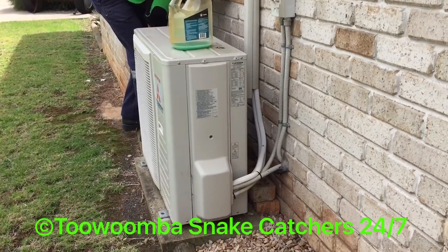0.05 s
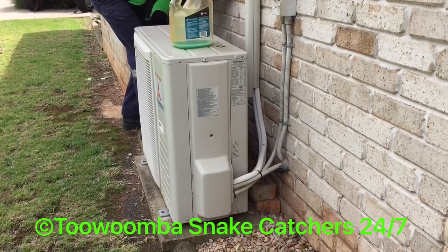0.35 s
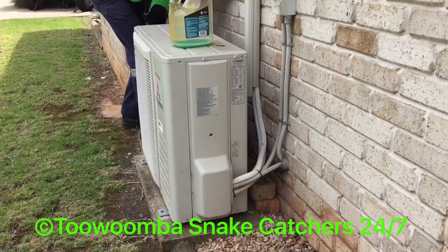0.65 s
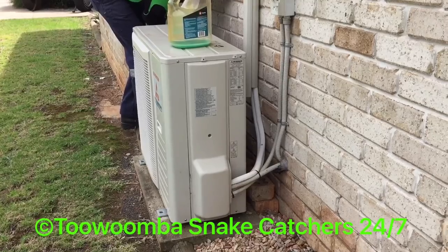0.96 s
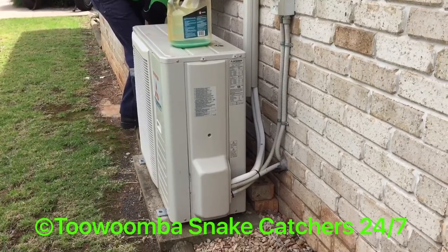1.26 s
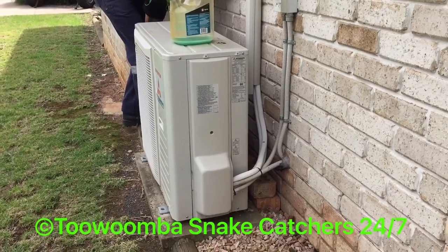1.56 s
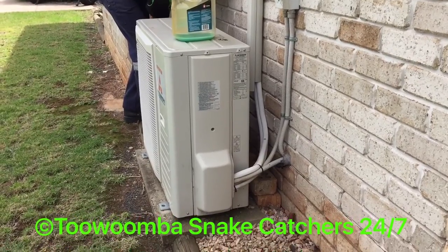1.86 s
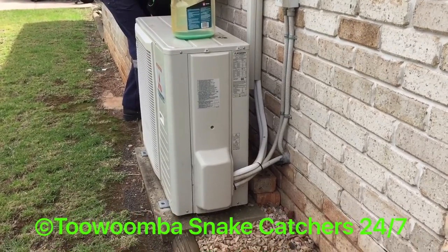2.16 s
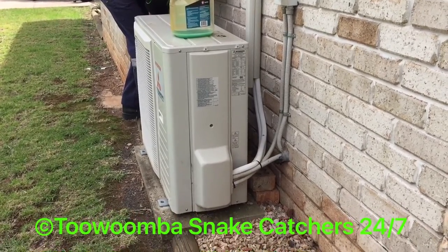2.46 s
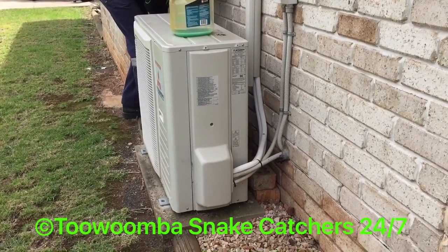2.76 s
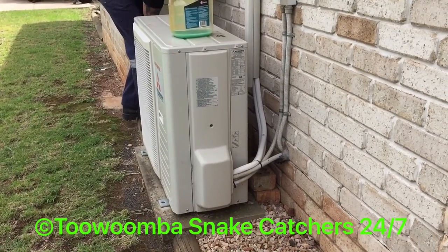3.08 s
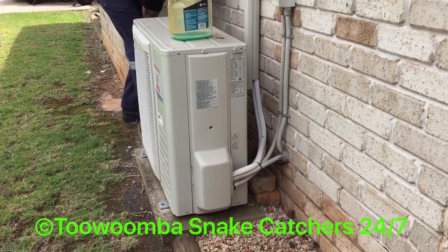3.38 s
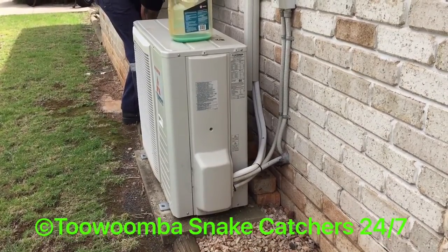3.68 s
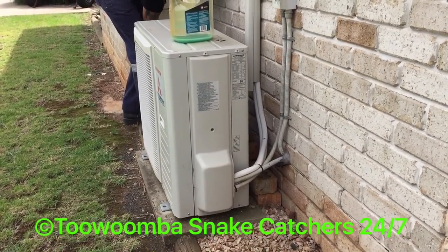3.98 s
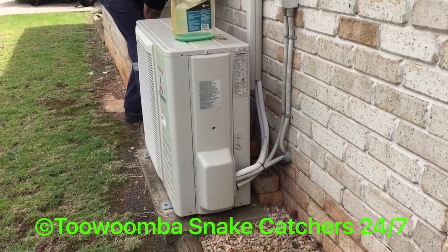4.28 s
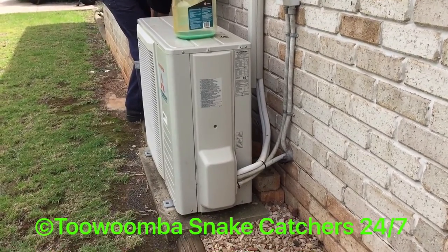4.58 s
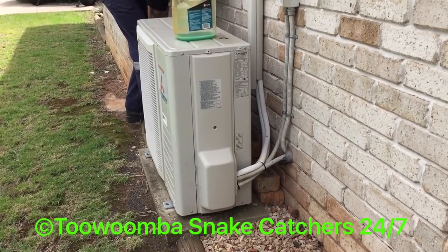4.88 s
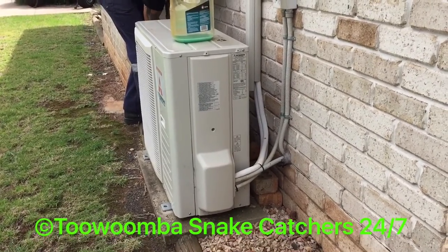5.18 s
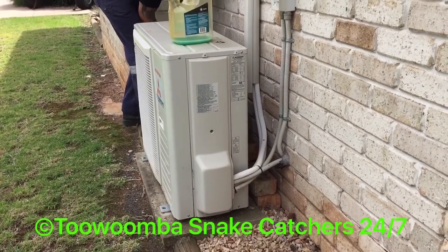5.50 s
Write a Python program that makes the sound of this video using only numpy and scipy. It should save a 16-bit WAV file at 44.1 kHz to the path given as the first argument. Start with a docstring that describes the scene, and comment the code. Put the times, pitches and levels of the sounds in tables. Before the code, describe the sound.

Outdoors, someone works by hand behind an idle air conditioner against a brick wall. At first there is mostly a low rumble, a distant engine hum, faint birds and a few wind bumps on the microphone. About halfway, clicks and short scrapes ring the sheet-metal cabinet and its panel booms softly. One louder knock with a metallic click follows, then lighter hollow knocks continue irregularly.

```python
"""Outdoors, behind an idle air conditioner that stands against a brick wall, someone works by hand.
Hard contacts click and scrape, ringing the sheet-metal cabinet and a small metal part. Soft blows
give hollow knocks that echo between cabinet and wall, and the big panel flexes and booms.
Under them lie a low outdoor rumble, a distant engine's hum, puffs of wind on the microphone
and faint birds that twitter, hoot and chirp."""
import sys
import numpy as np
from scipy import signal
from scipy.fft import rfft, irfft
from scipy.io import wavfile
from scipy.ndimage import uniform_filter1d

SR = 44100
rng = np.random.default_rng(int(sys.argv[2]) if len(sys.argv) > 2 else 0)


def log_audio(samples):
    """Write samples as a 16-bit WAV file to the path given in sys.argv[1]."""
    # one column per channel
    frames = np.atleast_2d(samples).T
    # limit to full scale, then quantise
    limited = np.clip(frames, -1, 1)
    pcm = np.round(limited * 32767).astype(np.int16)
    wavfile.write(sys.argv[1], SR, pcm)


N = 244314
TIME = np.arange(N) / SR
HIT_TIME = TIME[:SR // 2]  # the half second after a hit
TOP_HZ = 15950

# tones of the sheet-metal cabinet: (pitch [Hz], relative level [dB], time to fade by 60 dB [s])
CABINET_TONES = [(190, -3, .2), (247, -3, .25), (306, -8, .2), (340, -9, .16), (428, -3, .2), (764, -3, .2),
                 (836, -1, .14), (890, -1, .16), (966, -1, .15), (1088, 1, .2), (1190, -4, .17),
                 (1290, -1, .15), (1460, -2, .17), (1590, -1, .14), (1710, -4, .17), (2105, -6, .14),
                 (2449, -9, .13), (3004, -8, .17), (3160, -4, .18), (3262, -9, .13), (3526, -9, .14),
                 (3838, -9, .14), (4280, -12, .13), (5745, -15, .12), (6961, -14, .13), (7520, -13, .08),
                 (8134, -14, .08)]
# tones of the small metal part: (pitch [Hz], relative level [dB], time to fade by 60 dB [s])
METAL_TONES = [(2175, 8, 0.12), (2138, 17, 0.036), (2380, 2.5, 0.077), (2630, -34, 0.48), (3220, 9, 0.093),
               (3180, -38, 0.15), (4770, -29, 0.027), (4660, 2.5, 0.1), (6940, 2, 0.061),
               (9292, -67, 0.019)]
# the short, noisy ring of a hard contact: (frequency [Hz], relative level [dB])
CONTACT_SPECTRUM = [(120, -8), (330, 9.5), (630, -1.5), (850, 2), (1700, -4), (2100, -4), (3700, -4),
                    (5500, -12), (7800, -10.5), (10000, -15), (15500, -17)]
# how long that ring lasts: (frequency [Hz], time to fade by 60 dB [s])
CONTACT_DECAYS = [(200, 0.19), (1200, 0.086), (3500, 0.11), (7000, 0.072), (15000, 0.057)]
# grainy bursts; the first is the faint, high twitter of distant birds, the rest are scrapes:
# (time [s], length [s], level [dB], treble tilt [dB per octave],
# relative level of the cabinet tones [dB], pitch that stands out [Hz], its boost [dB])
BURSTS = [(1.041, .25, -69, -7, -26, 3900, 21.5), (3.049, 0.059, -44, 2, -20, 3500, 5.5),
          (3.125, 0.082, -38.5, 0, -6, 3940, 3.5), (3.227, 0.21, -51.5, -1, -5.5, 440, 14.5),
          (4.565, 0.051, -49, 0.5, -9, 2880, 8.5), (4.624, 0.026, -53, 4.5, -28, 2920, 19)]


def undb(db):
    """Turn decibels into a gain."""
    return 10 ** (np.asarray(db) / 20)


def unit(x):
    """Scale a sound to an average (rms) level of 1."""
    return x / np.sqrt(np.mean(x ** 2))


def unit_hit(x):
    """Scale a hit to the energy of 30 ms of sound at level 1."""
    return x / np.sqrt(np.sum(x ** 2) / (.03 * SR))


def at_hz(points, hz):
    """Look up a frequency in a table, blending between rows by octaves."""
    freqs, values = np.transpose(points)
    return np.interp(np.log(np.maximum(hz, 1)), np.log(freqs), values)


def shaped_noise(spectrum):
    """Noise with the given balance of bass and treble."""
    freqs = np.fft.rfftfreq(N, 1 / SR)
    return irfft(rfft(rng.standard_normal(N)) * undb(at_hz(spectrum, freqs)), N)


def band(x, low_hz, high_hz):
    """Keep what lies between two frequencies."""
    edges = [low_hz, min(high_hz, SR / 2 - 100)]
    return signal.sosfilt(signal.butter(2, edges, "band", fs=SR, output="sos"), x)


def wander(steps_per_s):
    """A smooth random drift, about 1 in size."""
    hold = int(SR / steps_per_s)
    steps = np.repeat(rng.standard_normal(N // hold + 1), hold)
    return unit(uniform_filter1d(uniform_filter1d(steps, hold), hold)[:N])


def add(out, start, x):
    """Mix x into out from a start time in seconds."""
    i = max(int(start * SR), 0)
    out[i:i + len(x)] += x[:max(N - i, 0)]


def fade(t60):
    """Die away by 60 dB every t60 seconds."""
    return np.exp(-np.log(1000) * HIT_TIME / t60)


def rise(seconds):
    """Grow from 0 towards 1, about two thirds of the way in the given time."""
    return 1 - np.exp(-HIT_TIME / seconds)


def ring(tones, scatter_db=2, detune=0.0032):
    """Struck metal rings with its own tones; each spot gives them slightly new levels and pitches."""
    out = 0
    for hz, db, t60 in tones:
        louder, phase, sharper = rng.standard_normal(3)
        wave = np.sin(2 * np.pi * (hz * (1 + detune * sharper) * HIT_TIME + phase))
        out = out + undb(db + scatter_db * louder) * wave * fade(t60)
    return unit_hit(out)


def dense_ring(spectrum, decays, tilt_db=0):
    """Countless tones and echoes blur into noise; each half octave fades at its own speed."""
    noise = rfft(rng.standard_normal(len(HIT_TIME)))
    freqs = np.fft.rfftfreq(len(HIT_TIME), 1 / SR)
    out = 0
    for hz in 125 * 2 ** (np.arange(15) / 2):
        inside = abs(np.log2((freqs + 1) / hz)) < 1 / 4
        part = irfft(noise * inside, len(HIT_TIME)) * fade(at_hz(decays, hz))
        gain = undb(at_hz(spectrum, hz) + tilt_db * np.log2(hz))
        out = out + unit_hit(part) * np.sqrt(hz) * gain  # higher bands are wider, so hold more energy
    return unit_hit(out)


def resonate(x, hz, width_hz, boost_db):
    """Make one pitch stand out of a hit, keeping the hit's energy."""
    b, a = signal.iirpeak(hz, hz / width_hz, fs=SR)
    return unit_hit(x + (undb(boost_db) - 1) * signal.lfilter(b, a, x))


def grainy(bursts, ticks_per_s=1300, scatter_db=5, rise_s=.009, fall_s=0.023, sharpness=3.2):
    """Streams of tiny uneven ticks, each ringing briefly, merge into grainy bursts."""
    out = np.zeros(N)
    n = len(HIT_TIME)
    for start, length, db, tilt_db, cabinet_db, peak_hz, boost_db in bursts:
        ending = np.exp(-np.maximum(HIT_TIME - length, 0) / fall_s)
        loudness = np.minimum(HIT_TIME / rise_s, 1) * ending
        ticks = (rng.random(n) < ticks_per_s / SR) * rng.choice([-1, 1], n)
        ticks = ticks * undb(scatter_db * rng.standard_normal(n)) * loudness
        # however the ticks fall, together they carry the same energy
        ticks = ticks * np.linalg.norm(loudness) / (np.linalg.norm(ticks) + 1e-9)
        grain = dense_ring(CONTACT_SPECTRUM, CONTACT_DECAYS, tilt_db) * fade(t60=0.076)
        grain = resonate(grain, peak_hz, peak_hz / sharpness, boost_db)
        grain += undb(cabinet_db) * ring(CABINET_TONES)
        grain += undb(-14) * ring(METAL_TONES, detune=0.0012)
        add(out, start, undb(db) * signal.fftconvolve(ticks, grain / np.linalg.norm(grain)))
    return band(out, 140, TOP_HZ)


def outdoor_rumble(level_db=-63, drift_db=0.41):
    """Outdoor air gives a steady low rumble with a faint hiss."""
    # the background noise: (frequency [Hz], relative level [dB])
    spectrum = [(15, -51), (25, -15), (49, 0), (69, 6.5), (119, -11), (140, -13), (227, -25), (322, -32),
                (552, -31.5), (703, -30), (782, -34.5), (1660, -38), (2770, -43.5), (3930, -45.5),
                (15500, -55.5)]
    air = shaped_noise(spectrum)
    air = air * undb(level_db) / np.std(band(air, 300, 15000))  # the level is set above the bass
    return band(air, 130, 14000) * undb(drift_db * wander(4.17))


def engine_hum(fade_s=0.11, waver_hz=1.59, flutter_db=2):
    """A distant engine's low tones come and go, wavering in pitch and level."""
    # spells of humming: (start [s], end [s], pitch [Hz], level [dB])
    spells = [(0, 0.892, 69.5, -50.5), (0, 0.534, 111.7, -52), (1.156, 1.745, 111.3, -53.5),
              (2.85, 3.3, 57.1, -58.5), (2.88, 4.8, 112.3, -55)]
    out = np.zeros(N)
    for start, end, hz, db in spells:
        sounding = np.clip(np.minimum(TIME - start, end - TIME) / fade_s + 1, 0, 1)
        phase = 2 * np.pi * np.cumsum(hz + waver_hz * wander(14)) / SR
        out += sounding * np.sqrt(2) * np.sin(phase) * undb(db + flutter_db * wander(12))
    return out


def wind(breeze_db=-61, bump_s=0.0073):
    """Swirls of air buffet the microphone, harder in each gust; the strongest land as single bumps."""
    # the swirling air: (frequency [Hz], relative level [dB])
    spectrum = [(20, -43), (35, -15.5), (52, 2), (75, -14), (110, -12), (170, -19), (260, -31), (600, -100)]
    # gusts: (middle [s], time spent above half strength [s], level [dB])
    gusts = [(1.19, 0.088, -68), (1.995, 0.42, -52.5), (2.406, 0.11, -49), (2.67, 0.081, -48),
             (5.42, 0.13, -63)]
    # low bumps on the microphone: (time [s], level [dB], pitch [Hz])
    bumps = [(1.826, -35, 129), (1.869, -35, 105), (1.922, -34, 78.4), (2.639, -36, 68)]
    flow = undb(breeze_db)
    for middle, length, db in gusts:
        flow = flow + undb(db) * .5 ** ((2 * (TIME - middle) / length) ** 2)
    out = unit(shaped_noise(spectrum)) * flow
    bump_shape = HIT_TIME / bump_s * np.exp(1 - HIT_TIME / bump_s)
    for start, db, hz in bumps:
        add(out, start, undb(db) * bump_shape * np.sin(2 * np.pi * hz * HIT_TIME))
    return out


def clicks(spot_width_hz=305, spread_s=0.0051):
    """A hard contact cracks, then ringing spreads through the cabinet and the small metal part."""
    # hard contacts: (time [s], crack level [dB], treble tilt [dB per octave], rise time [s],
    # pitch of the struck spot [Hz], its boost [dB], cabinet ring [dB], metal part ring [dB])
    contacts = [(.184, -56, 5, .001, 2130, 16.5, -62, -58), (0.84, -51, -1.5, 0.012, 3100, 8, -63, -76),
                (.872, -55, -0.5, 0.0014, 2530, 19, -76, -54.5),
                (1.45, -58.5, 0, .0017, 4400, 9.5, -80, -60.5),
                (2.923, -43.5, -0.5, 0.0072, 5850, 13, -61, -80),
                (3.128, -41, -0.5, 0.00099, 9800, 12, -73, -48),
                (3.302, -47, -2.5, 0.00033, 5000, 10, -72, -79),
                (3.36, -34, 0.5, 0.0044, 1550, 11.5, -39, -61),
                (3.466, -47.5, 1.5, 0.0012, 4700, 10, -58, -42.5),
                (3.5135, -29, -1.44, 0.00044, 972, 8, -53, -33.5),
                (3.566, -51.5, -2, 0.00046, 1100, 1, -61, -66),
                (3.617, -60, 2.5, 0.0012, 5800, 10, -80, -62),
                (3.783, -35.5, 1.5, 0.007, 1600, 10.5, -39, -49),
                (4.066, -35.5, 0.5, 0.0082, 1680, 7.5, -37, -63),
                (4.116, -44.5, 1, 0.0032, 1700, 13, -43, -61), (4.714, -67, 5, 0.0012, 7140, 13, -81, -74),
                (5.3673, -44.5, -1.5, .00025, 2600, 14, -62, -78)]
    out = np.zeros(N)
    for start, db, tilt_db, rise_s, spot_hz, boost_db, cabinet_db, metal_db in contacts:
        crack = dense_ring(CONTACT_SPECTRUM, CONTACT_DECAYS, tilt_db)
        crack = undb(db) * resonate(crack, spot_hz, spot_width_hz, boost_db)
        cabinet = undb(cabinet_db) * ring(CABINET_TONES)
        metal = undb(metal_db) * ring(METAL_TONES, detune=0.00037)
        add(out, start, crack * rise(rise_s) + (cabinet + metal) * rise(spread_s))
    return out


def knocks(swell_s=0.00086, echo_rise_s=0.0055):
    """A soft blow pushes out two or three hollow waves, which bounce between cabinet and wall."""
    # soft blows: (time [s], level [dB], pitch [Hz])
    blows = [(.841, -45, 370), (3.165, -32, 208), (3.282, -34.5, 334), (3.514, -16.5, 433),
             (3.518, -14.5, 437), (3.568, -34, 460), (3.725, -33, 412), (3.795, -30, 384),
             (4.048, -38.5, 452), (4.2058, -45, 477), (4.229, -44.5, 400), (4.2964, -50, 485),
             (4.431, -39, 495), (4.449, -38.5, 366), (4.515, -49.5, 504), (4.701, -35.5, 533),
             (4.736, -44.5, 433), (4.85, -29, 440), (4.925, -28, 450), (5.253, -29, 433),
             (5.3181, -29.5, 456), (5.368, -36, 510), (5.484, -37, 420), (5.518, -37, 414)]
    # the echo in the gap behind the cabinet: (frequency [Hz], relative level [dB])
    gap_spectrum = [(80, -1), (170, 9.5), (250, 2), (350, 2.5), (480, -3.5), (880, 2.5), (1150, -33),
                    (1700, -21), (4000, -56)]
    # how long that echo lasts: (frequency [Hz], time to fade by 60 dB [s])
    gap_decays = [(150, 0.072), (500, 0.12), (1200, 0.039)]
    out = np.zeros(N)
    push = (HIT_TIME / swell_s / 2) ** 2 * np.exp(2 - HIT_TIME / swell_s)
    echo_rise = 1 - np.exp(-(HIT_TIME / echo_rise_s) ** 2)
    for start, db, hz in blows:
        thud = push * np.sin(2 * np.pi * hz * HIT_TIME)
        echo = unit_hit(dense_ring(gap_spectrum, gap_decays) * echo_rise)
        echo_db = -21.5 - 0.19 * db  # lighter blows have more echo for their thud
        add(out, start, undb(db) * (thud + undb(echo_db) * echo))
    return out


def bird_twitter():
    """Distant birds give a faint, high twitter."""
    return grainy(BURSTS[:1])


def bird_hoots(pitch_hz=702, note_s=.04, echo_db=-9, waver_db=2):
    """A far bird hoots short notes on one pitch, each trailing a long, wavering echo."""
    # hoots: (time [s], level [dB])
    notes = [(1.093, -59), (1.208, -56), (1.533, -58.5)]
    out = np.zeros(N)
    progress = np.minimum(HIT_TIME / note_s, 1)
    tone = np.sin(2 * np.pi * pitch_hz * HIT_TIME)
    for start, db in notes:
        echo = progress * fade(t60=.8) * undb(echo_db + waver_db * wander(34)[:len(HIT_TIME)])
        add(out, start, undb(db) * (np.sin(np.pi * progress) + echo) * tone)
    return out


def bird_chirp(level_db=-58, overtone_db=-18, echo_db=-7):
    """A small bird's chirp and a thin whistle, blurred by echoes off the houses."""
    start_s, onset_s, climb_s, fall_s = 2.531, 0.00094, .034, .016
    low_hz, high_hz, whistle_hz = 2310, 2980, 4000
    up = np.clip((TIME - start_s) / climb_s, 0, 1)
    down = np.clip((TIME - start_s - climb_s) / fall_s, 0, 1)
    # the pitch slides up ever faster, then drops back as the chirp fades
    pitch = low_hz + (high_hz - low_hz) * up ** 2 * (1 - down)
    phase = 2 * np.pi * np.cumsum(pitch) / SR
    loudness = np.minimum(up * climb_s / onset_s, 1) * (1 - down)
    song = loudness * (np.sin(phase) + undb(overtone_db) * np.sin(2 * phase))
    whistle = np.sin(2 * np.pi * whistle_hz * HIT_TIME) * fade(t60=.08) * rise(onset_s)
    add(song, start=2.565, x=whistle)
    reflections = rng.standard_normal(len(HIT_TIME)) * fade(t60=0.097)
    echo = signal.fftconvolve(song, reflections / np.linalg.norm(reflections))[:N]
    return undb(level_db) * (song + undb(echo_db) * echo)


def panel_booms(pitch_hz=112):
    """The cabinet's big panel flexes, and its lowest tone swells and dies away."""
    # flexes of the panel: (time [s], level [dB])
    flexes = [(2.929, -30), (3.138, -35), (3.188, -29), (3.284, -36), (3.784, -38)]
    out = np.zeros(N)
    boom = np.sin(2 * np.pi * pitch_hz * HIT_TIME) * fade(t60=.22) * rise(seconds=0.0059)
    for start, db in flexes:
        add(out, start, undb(db) * boom)
    return out


def scrapes():
    """Rubbing catches and lets go in many tiny taps that ring the cabinet and the metal part."""
    return grainy(BURSTS[1:])


def scene():
    """All the sounds meet at one microphone."""
    hits = band(clicks() + knocks(), 75, SR / 2)  # the clicks and knocks carry no deep bass
    twitter = bird_twitter()
    handwork = hits + scrapes() + panel_booms()
    outdoors = outdoor_rumble() + engine_hum() + wind() + twitter + bird_chirp() + bird_hoots()
    return (handwork + outdoors)[None]


def record(dry):
    """The phone cuts off the highest treble."""
    return signal.sosfilt(signal.ellip(10, .2, 70, TOP_HZ, fs=SR, output="sos"), dry)


dry = scene()
out = record(dry)
log_audio(out)
```